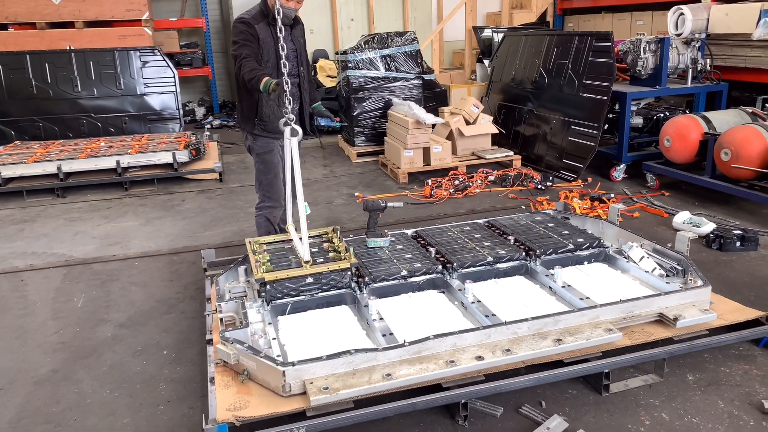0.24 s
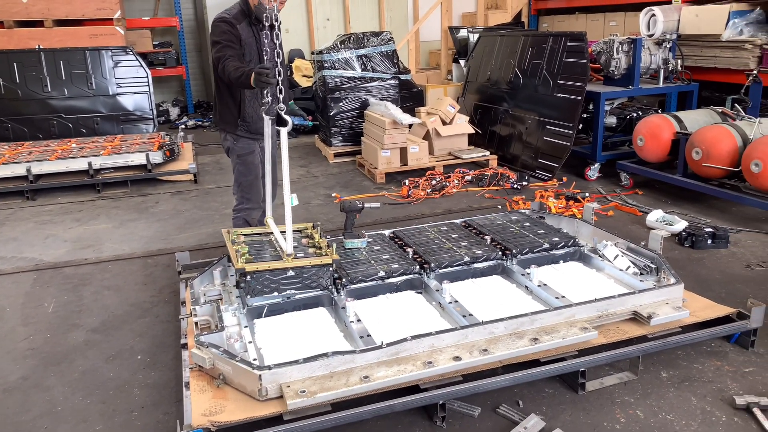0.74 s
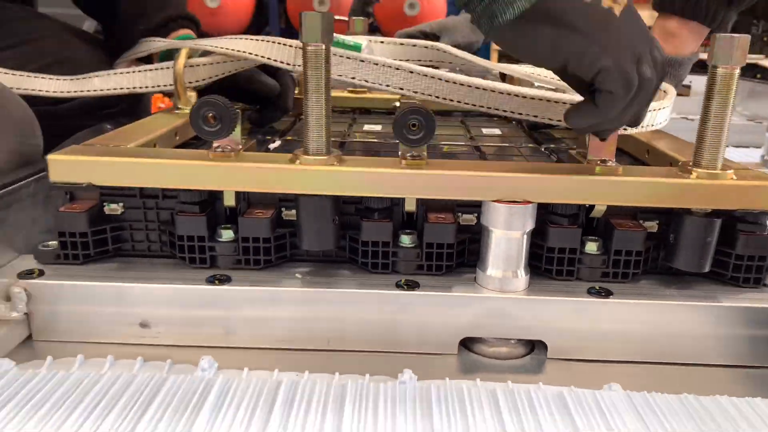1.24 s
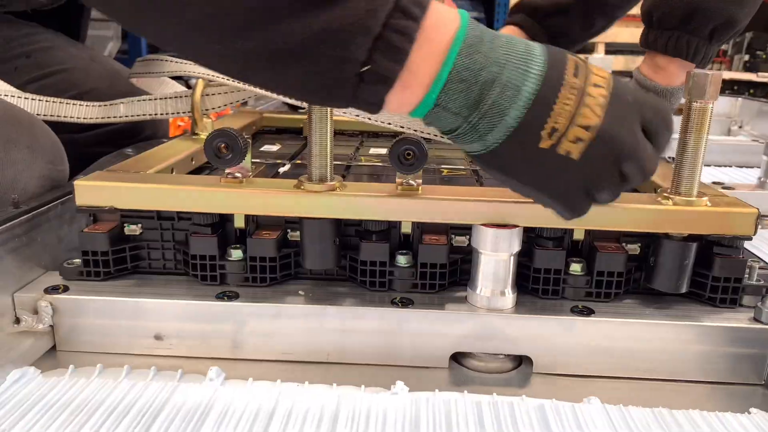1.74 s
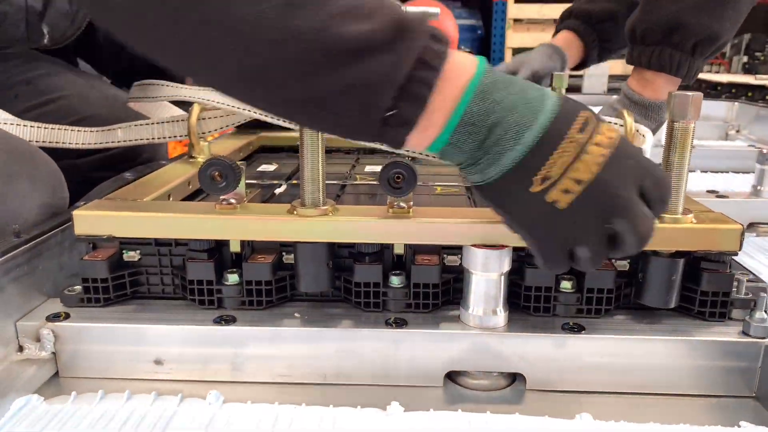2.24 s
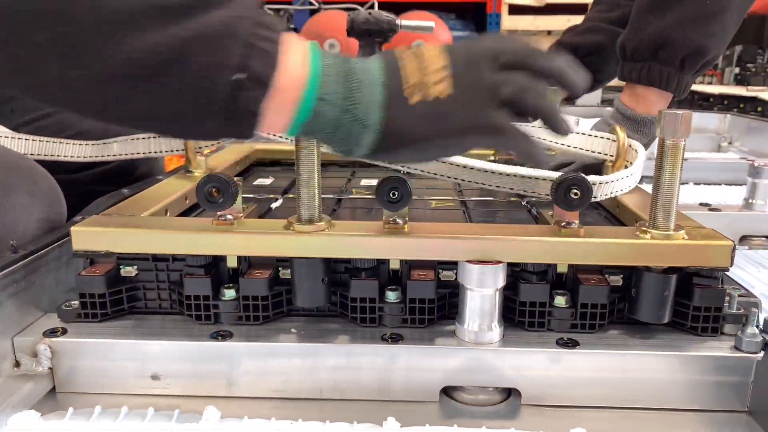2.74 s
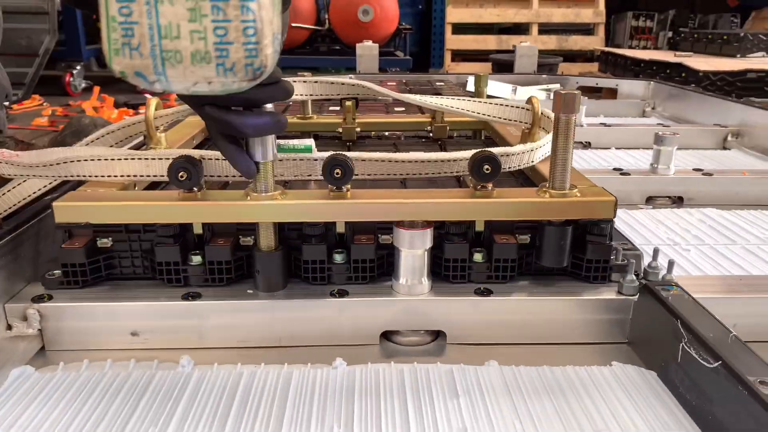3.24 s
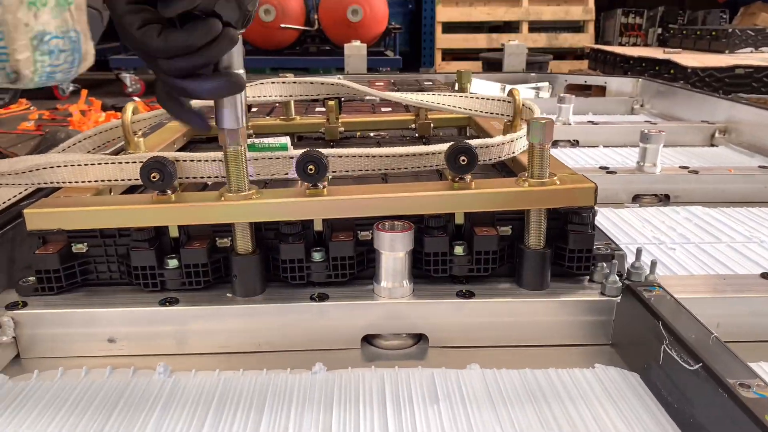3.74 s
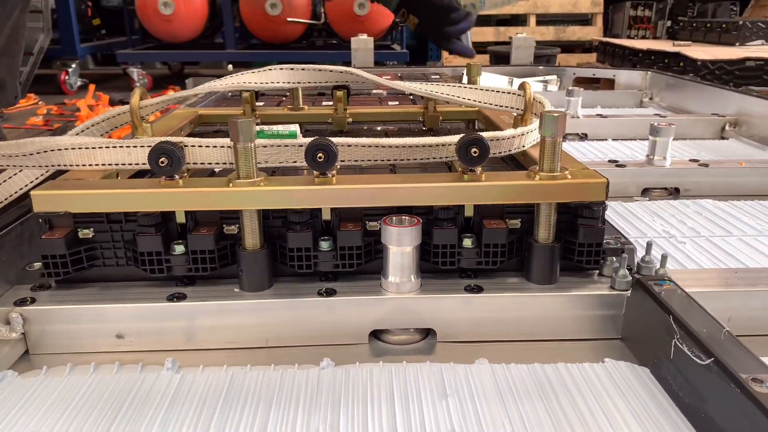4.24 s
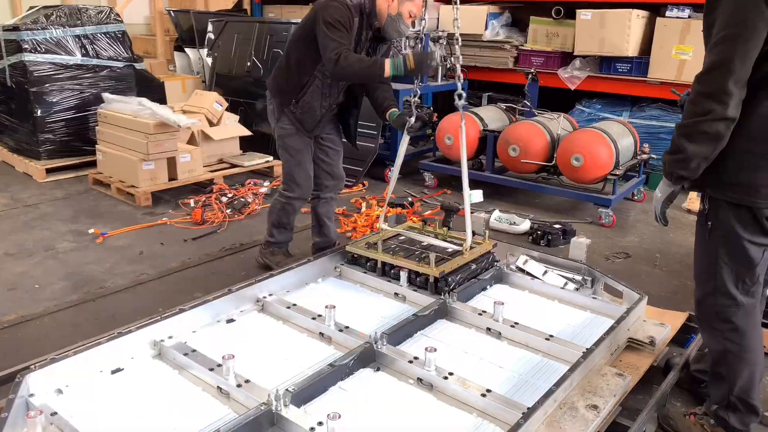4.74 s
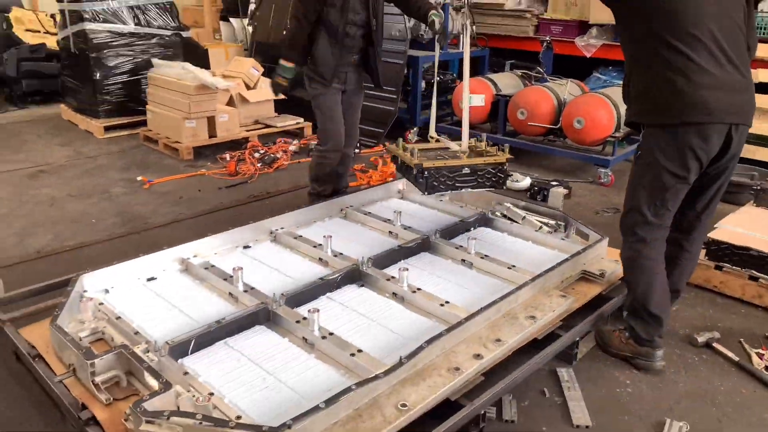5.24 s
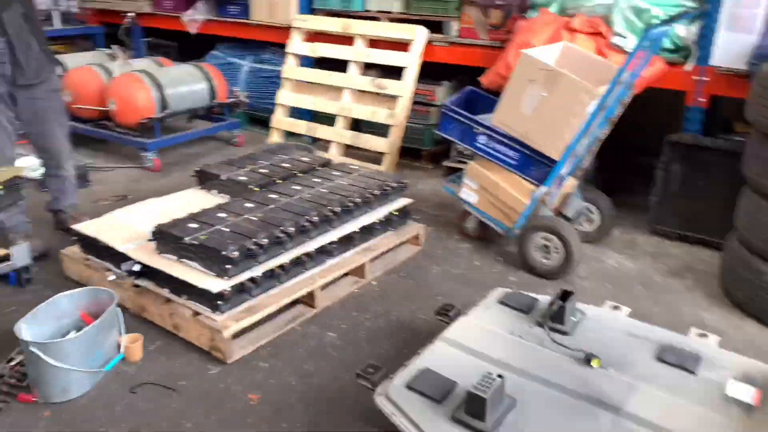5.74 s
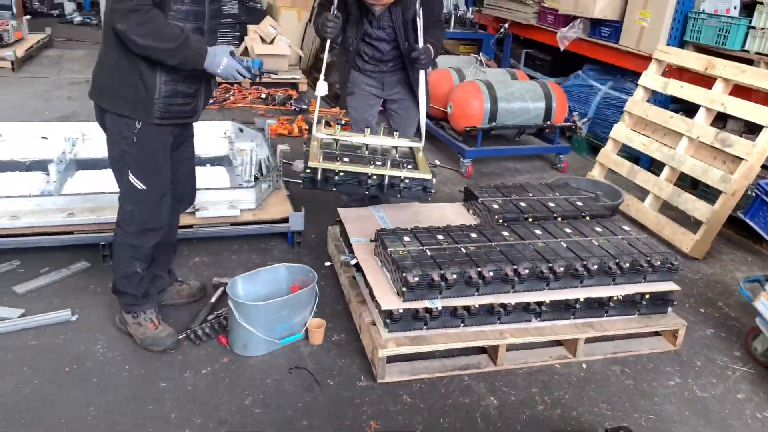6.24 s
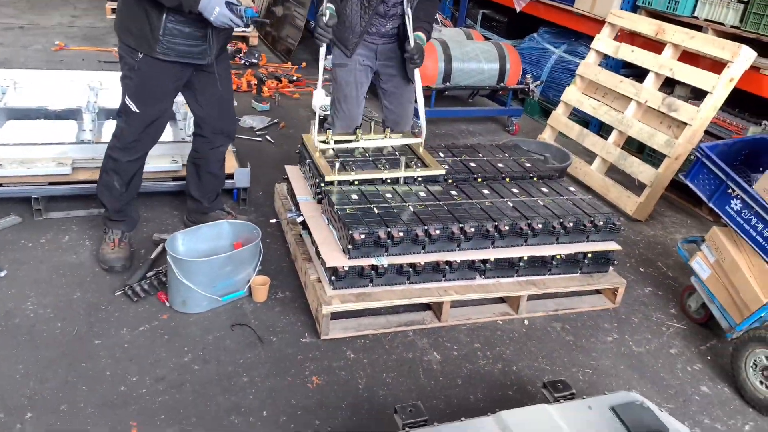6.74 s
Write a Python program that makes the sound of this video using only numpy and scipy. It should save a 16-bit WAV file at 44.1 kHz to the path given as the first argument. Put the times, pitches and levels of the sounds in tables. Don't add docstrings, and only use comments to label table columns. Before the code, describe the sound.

In a workshop yard, a soft low rumble with airy puffs and distant hoist hum plays for under a second. It cuts to close, dense, sped-up clicks and knocks of plastic knobs on a metal frame with glove scratching. Then a ratchet socket whirrs in short bursts with taps. Finally, farther back in a reverberant hall, steel bangs, chain jingles and a motor whines.

```python
import sys
import numpy as np
from scipy import signal
from scipy.fft import rfft, irfft, next_fast_len
from scipy.io import wavfile
from scipy.ndimage import uniform_filter1d

SR = 44100
rng = np.random.default_rng(int(sys.argv[2]) if len(sys.argv) > 2 else 0)


def wav_out(sig):
    wavfile.write(sys.argv[1], SR, np.round(np.clip(np.atleast_2d(sig).T, -1, 1) * 32767).astype(np.int16))


def gain_from_decibels(decibels):
    exponent = np.asarray(decibels, float) / 20
    return 10 ** exponent


N = 307816
SIZE = next_fast_len(N)

# frequency in Hz, level in dB, t60 in s.
FRAME_MODES = [(502, -16.5, 0.084), (652, -10, 0.07), (891, -10, 0.05), (1042, 0.5, 0.022),
               (1270, 3, 0.022), (1310, -10, 0.05), (1420, -3, 0.018), (1780, 2, 0.012), (2190, 0, 0.009),
               (2594, -1, 0.009), (3120, -4, 0.012)]
# frequency in Hz, level in dB, t60 in s.
STEEL_MODES = [(546, -6.5, 0.016), (915.6, 3, 0.038), (780, -18, 0.075), (1007, -4, 0.11),
               (1181, -9.5, 0.056), (1364, 0.5, 0.032), (1574, 3.5, 0.019), (1735, 2, 0.042),
               (2040, -9, 0.01), (2024, 5, 0.021), (2150, -9, 0.024), (2362, 0.5, 0.026), (2587, 9, 0.0065),
               (2830, -14.5, 0.075), (3710, -14, 0.14), (3865, -10, 0.014), (4230, -4, 0.012)]
# frequency in Hz, level in dB.
MAINS_HUM = [(180, -66), (480, -55)]
# start in s, body in dB, whirr in dB, pawl pitch factor, brightness in dB per octave.
RATCHET_BURSTS = [
    (3.098, -39, -42.5, 0.94, -7),
    (3.128, -62, -31.5, 0.84, -3.0),
    (3.163, -53, -34.5, 0.91, -3),
    (3.216, -45, -37.5, 0.95, 2),
    (3.296, -41, -33, .99, 6.5),
    (3.577, -37, -36.5, 0.96, -3.5),
    (3.874, -42, -36, 0.96, -1.5),
    (4.132, -48, -36.5, 0.96, -.8),
]


def rms_one(x):
    return x / np.sqrt(np.mean(x ** 2) + 1e-20)


def in_time(rows):
    s, *columns = np.transpose(rows)
    return [np.interp(np.arange(N) / SR, s, column) for column in columns]


def at_hz(points, hz):
    point_hz, value = np.array(points).T[:2]
    return np.interp(np.log(hz), np.log(point_hz), value)


def high_pass(x, order, cut_hz):
    return signal.sosfilt(signal.butter(order, cut_hz, "high", fs=SR, output="sos"), x)


def drift(rate_hz):
    r = np.exp(-80 * np.pi * rate_hz / SR)
    slow = signal.lfilter([1], [1, -2 * r, r * r], rng.standard_normal(N // 40 + 2002))[2000:]
    return np.interp(np.arange(N) / 40, np.arange(len(slow)), rms_one(slow))


def ring(clicks, hz, t60_s):
    r = gain_from_decibels(-60 / (t60_s * SR))
    w = 2 * np.pi * hz / SR
    return signal.lfilter([0, np.sin(w)], [1, -2 * r * np.cos(w), r * r], clicks + 1e-18)


def grit(per_s, spread_db):
    sizes = gain_from_decibels(spread_db * np.minimum(rng.exponential(1, N), 4)) * rng.choice([-1, 1], N)
    return sizes * (rng.random(N) < per_s / SR)


def coloured(spectrum, mid, side):
    # frequency in Hz, left-right likeness.
    likeness = [(60, 0.78), (180, 0.86), (550, 0.82), (1650, 0.79), (4970, 0.12), (15000, 0.45)]
    hz = np.maximum(np.arange(SIZE // 2 + 1) * SR / SIZE, 1)
    alike = np.clip(at_hz(likeness, hz), 0, 1)
    mid = np.sqrt(1 + alike) * rfft(mid, SIZE)
    side = np.sqrt(1 - alike) * rfft(side, SIZE)
    pair = gain_from_decibels(at_hz(spectrum, hz)) * np.array([mid + side, mid - side])
    return rms_one(irfft(pair, SIZE)[:, :N])


def noise(spectrum, flicker_db):
    return gain_from_decibels(flicker_db * drift(4.7)) * coloured(spectrum, *rng.standard_normal((2, N)))


def rattle(modes, level_db, per_s, spread_db, shift_db=0):
    clicks = gain_from_decibels(level_db) * rms_one(grit(per_s, spread_db))
    power = sum(gain_from_decibels(2 * db) * t60_s * SR / (4 * np.log(1000)) for _, db, t60_s in modes)
    total = 0
    for hz, db, t60_s in modes:
        favour = gain_from_decibels(shift_db * drift(12)) if shift_db else 1
        total = total + gain_from_decibels(db) * ring(clicks * favour * rng.standard_normal(N), hz, t60_s)
    return total / np.sqrt(power)


def tones(lines, wobble_db):
    turns = np.cumsum(1 + .002 * drift(15)) / SR
    return sum(np.sqrt(2) * gain_from_decibels(db + wobble_db * drift(12)) * np.sin(2 * np.pi * (hz * turns + rng.random()))
               for hz, db in lines)


def hits(events, modes, click_db, crack_db, body_db, scatter, contact_s):
    out, t = np.zeros((2, N + 3000)), np.arange(3000) / SR
    hz, db, t60_s = np.transpose(modes)[:, :, None]
    build_up = 1 - np.exp(-(t / contact_s) ** 2)
    crack_band = signal.butter(1, [1800, 15000], "band", fs=SR)
    for s, top_db, low_db, top_hz, crack_s in events:
        jitter = np.cumsum(.12 * rng.standard_normal(len(t)))
        click = gain_from_decibels(click_db) * np.sin(2 * np.pi * top_hz * t + jitter)
        crack = gain_from_decibels(crack_db) * signal.lfilter(*crack_band, rng.standard_normal((2, len(t))))
        top = gain_from_decibels(top_db - 60 * t / crack_s) * (click + crack)
        held_hz = hz * (1 + scatter * rng.standard_normal(hz.shape))
        ringing = gain_from_decibels(db - 60 * t / t60_s) * np.sin(2 * np.pi * held_hz * t)
        body = rng.standard_normal(len(modes)) @ ringing
        body *= gain_from_decibels(low_db + body_db) / np.abs(body).max()
        pan = gain_from_decibels(0.74 * rng.standard_normal() * np.array([[1], [-1]]))
        at = round(s * SR)
        out[:, at:at + len(t)] += (top + body) * build_up * pan
    return out[:, :N]


def efforts(start_s, hold_s, level_db, rise_db_s, fall_db_s, rest_db):
    t = np.arange(0, N, 32) / SR
    late = t - start_s[:, None]
    rising = rise_db_s * np.minimum(late, 0)
    falling = fall_db_s * np.maximum(late - hold_s[:, None], 0)
    each = level_db[:, None] + rising - falling
    return np.interp(np.arange(N) / SR, t, np.maximum(each.max(axis=0), rest_db))


def room(x, t60_s, wet_db, cut_hz):
    t = np.arange(SR // 2) / SR
    tail = coloured([(300, 0), (cut_hz, 0), (16000, -14)], *rng.standard_normal((2, N)))[:, :len(t)]
    tail = tail * gain_from_decibels(-60 * t / t60_s) * (t > .002)
    tail /= np.sqrt(np.mean(np.sum(tail ** 2, axis=1)))
    return x + gain_from_decibels(wet_db) * signal.fftconvolve(x * np.ones((2, 1)), tail, axes=1)[:, :N]


def hall():
    # frequency in Hz, density in dB per Hz.
    hall_colour = [(59, -58.5), (100, -15.5), (301, -9), (469, 2), (580, 1), (1240, 2), (1350, -3.5),
                   (2250, -3.5), (3900, -9.5), (5720, -17.5), (15800, -69.5)]
    return noise(hall_colour, flicker_db=3.0)


def far_air_line():
    # time in s, level in dB.
    puff_levels = [(0.0, -65), (0.092, -74), (0.244, -55), (0.432, -84), (0.55, -59), (0.566, -74),
                   (0.696, -59), (0.806, -79), (0.86, -52.5)]
    # frequency in Hz, density in dB per Hz.
    puff_colour = [(5000, -26), (7500, 0), (9900, 3), (11000, -10), (11500, -34), (12900, -4), (15000, -15),
                   (15600, -30)]
    return gain_from_decibels(in_time(puff_levels)[0]) * noise(puff_colour, flicker_db=2)


def far_hoist():
    # frequency in Hz, level in dB.
    far_lines = [(506.0, -47), (839.8, -59.5), (1007, -59.5), (2013, -69), (2180, -62.5)]
    # time in s, level in dB.
    far_swell = [(0, -3), (.3, -14), (.45, 1.5), (.62, -1.5), (.7, -4.5), (.87, -13)]
    return gain_from_decibels(in_time(far_swell)[0]) * tones(far_lines, wobble_db=3.5)


def yard():
    # time in s, low rumble in dB, air in dB.
    yard_levels = [
        (0.0, -35.5, -40),
        (0.044, -40.5, -45.5),
        (0.865, -42.5, -55),
    ]
    # frequency in Hz, density in dB per Hz.
    rumble_colour = [(15, -54), (25, -37), (46, -22), (113, -2), (220, -1), (444, -8), (501, -7.5),
                     (626, -13), (1500, -55), (1950, -54), (3300, -120)]
    air_colour = [(470, -42), (800, -3.5), (3330, -13), (4370, -15), (7180, -29), (9920, -35), (11500, -60),
                  (12900, -44), (15500, -43)]
    # frequency in Hz, level in dB, t60 in s.
    low_hum_modes = [(61, -1.5, .5), (110, 8, 0.28), (163, -9, 0.26), (222.7, 2.5, 0.43), (326, -7, 0.35),
                     (379, -5.5, 0.35)]
    # start in s, click in dB, body in dB, click in Hz, crack t60 in s.
    scuff_events = [
        (.697, -40, -42, 4600, .06),
        (.712, -40, -44, 4150, .06),
    ]
    rumble_db, air_db = in_time(yard_levels)
    rumble = gain_from_decibels(rumble_db) * noise(rumble_colour, flicker_db=1.0)
    air = gain_from_decibels(air_db) * noise(air_colour, flicker_db=1.6)
    low_hum = rattle(low_hum_modes, -42.5, 3000, spread_db=1.0)
    scuff = hits(scuff_events, STEEL_MODES[1:4], click_db=0, crack_db=-22, body_db=0, scatter=.02, contact_s=.003)
    return rumble + air + far_air_line() + low_hum + far_hoist() + scuff


def knob_knocks():
    # start in s, click in dB, frame in dB, click in
    # Hz.
    knock_events = [(0.9006, -22, -18, 8400), (0.9137, -21.5, -23.5, 5750), (0.9502, -14, -14, 4080),
                    (0.9883, -18, -29, 7740), (1.0285, -16.5, -21, 7500), (1.0687, -19, -19, 5800),
                    (1.0982, -5, -11, 6430), (1.1606, -18.5, -30, 7800), (1.2903, -18.5, -25, 10100),
                    (1.321, -8, -19, 8760), (1.4235, -18, -20.5, 4060), (1.4567, -9.5, -11, 3930),
                    (1.5135, -23, -15, 4100), (1.7067, -14.5, -36, 8400), (1.7328, -19, -35, 8600),
                    (1.7656, -14.5, -15, 10000), (1.8418, -17, -34, 9700), (1.8767, -17.5, -35, 8700),
                    (1.9072, -19, -18.5, 9250), (2.3573, -13.5, -42, 11400), (2.4424, -15.5, -11, 6000),
                    (2.5316, -21, -55, 10100), (2.5979, -14, -18.5, 6200), (2.6915, -17.5, -22.5, 4770),
                    (2.72, -12.5, -16, 4230), (2.784, -12.5, -15, 4240), (2.9367, -10, -11, 4790),
                    (0.9246, -21.5, -25, 5900), (0.956, -18.5, -14, 3000), (.998, -27, -30, 7500),
               (1.083, -47, -25, 3000), (1.1654, -30, -23, 7400), (1.193, -32, -45, 7550),
               (1.3182, -20, -40, 9000), (1.5188, -24, -17, 2970), (1.5444, -33, -21.5, 3000),
               (1.5774, -32.5, -36, 7000), (1.5863, -34, -27, 6000), (1.628, -31, -32, 8550),
               (1.6458, -34, -32, 8000), (1.709, -15, -37, 8700), (1.83, -35, -36, 9000),
               (1.855, -30, -25, 8900), (1.880, -20, -33, 8550), (1.918, -25, -28, 8000),
               (1.94, -28, -36, 9000), (1.971, -33, -33, 9000), (2.095, -26, -25, 8700),
               (2.102, -36, -34, 9400), (2.239, -26, -26, 10500), (2.271, -27.5, -35, 9200),
               (2.3922, -25, -34, 2950), (2.4224, -38, -27, 2980), (2.5938, -22, -26, 6100),
               (2.6593, -28, -26, 5960), (2.6872, -22, -26, 5960), (2.699, -25, -16, 4000),
               (2.7155, -21, -25, 3950), (2.731, -22.5, -26, 9050), (2.7422, -15, -25, 6100),
               (2.817, -17, -17, 2500), (2.8435, -23, -21, 6040), (2.949, -21, -34, 3070),
               (2.966, -25.5, -29, 2600)]
    # start in s, click in dB, click in
    # Hz.
    further_knocks = [(1.1422, -25, 9900), (1.2301, -22, 8000), (1.4862, -18, 3930), (1.5612, -22.5, 4300),
                      (1.6672, -21.5, 9640), (1.689, -28, 9800), (1.176, -21, 8800), (1.33, -16, 4800),
                      (1.385, -19.5, 3640), (1.953, -22, 9000), (2.004, -26, 3740), (2.0437, -20.5, 8650),
                      (2.09, -22, 4600), (2.124, -22, 8100), (2.188, -15, 10000), (2.2622, -20.5, 4600),
                      (2.225, -19, 6100), (2.3096, -16.5, 3800), (2.476, -15, 11000), (2.6223, -20, 4450),
                      (2.6398, -17.5, 4270), (2.653, -18.5, 6270), (2.8343, -19.5, 4460), (2.871, -21, 11400),
                      (2.8954, -18.5, 8000)]
    # start in s, click in dB, frame in dB, click in Hz.
    pin_pings = [
        (2.1641, 0.5, -46, 9560),
        (2.2146, -8, -40, 9020),
        (2.295, -15.5, -30, 8600),
    ]
    touches = knock_events + [(s, db, db - 1, hz) for s, db, hz in further_knocks]
    events = [(*touch, .0085) for touch in touches]
    bounces = rng.random((len(touches), 3)) * [.005, -8, .4] + [.002, -10, .8]
    for (s, top_db, low_db, hz), (lag_s, loss_db, shift) in zip(touches, bounces):
        events.append((s + lag_s, top_db + loss_db, low_db + loss_db, hz * shift, .007))
    knocks = hits(events, FRAME_MODES, click_db=-1.0, crack_db=3.5, body_db=-1.0, scatter=0.049, contact_s=0.00072)
    pings = hits([(*ping, .012) for ping in pin_pings], FRAME_MODES, click_db=0, crack_db=-14, body_db=2,
                 scatter=.04, contact_s=.0016)
    return knocks + pings


def knobs():
    # start in s, hold in s, frame rattle in dB, scratch in dB.
    grips = [(0.941, 0.058, -41, -49.5), (1.164, 0.0053, -31, -41), (1.24, 0.083, -50, -42.5),
             (1.305, 0.14, -39.5, -37), (1.452, 0.096, -53, -43.5), (1.68, 0.097, -40.5, -50),
             (1.76, 0.051, -45, -42.5), (1.864, 0.24, -39.5, -48), (2.132, 0.035, -34, -32.5),
             (2.197, 0.11, -42.5, -50.5), (2.347, 0.0059, -34, -32.5), (2.368, 0.0115, -37, -28.5),
             (2.408, 0.11, -38.5, -35.5), (2.528, 0.0077, -36.5, -27), (2.584, 0.11, -39.5, -45),
             (2.741, 0.0047, -28, -30.5), (2.76, 0.27, -38.5, -41)]
    # frequency in Hz, density in dB per Hz.
    scratch_colour = [(1470, -49), (2500, -23.5), (3560, -5), (6310, 0), (7190, -1), (9570, 3), (15800, -2)]
    start_s, hold_s, rattle_db, scratch_db = np.transpose(grips)
    rise_db_s, fall_db_s = 1407, 447
    rattle_db = efforts(start_s, hold_s, rattle_db, rise_db_s, fall_db_s, rest_db=-49.5)
    scratch_db = efforts(start_s, hold_s, scratch_db, rise_db_s, fall_db_s, rest_db=-55.5)
    frame = rattle(FRAME_MODES, rattle_db - 4, 700, spread_db=3.5, shift_db=5)
    scratch = coloured(scratch_colour, grit(6000, spread_db=2.5), grit(6000, spread_db=2.5))
    near = room(knob_knocks() + frame, t60_s=.06, wet_db=-17.0, cut_hz=3000)
    return near + gain_from_decibels(scratch_db + 3 * drift(60)) * scratch + tones(MAINS_HUM, wobble_db=1.5)


def ratchet(start_s, now):
    # frequency in Hz, density in dB per Hz.
    whirr_colour = [(880, -47), (1500, -18), (2600, -21), (3430, -9), (5560, 0), (9940, 1.5), (15800, -5)]
    # frequency in Hz, level in dB, t60 in s.
    pawl_modes = [(1360, -20.5, .03), (2080, -12, 0.0095), (2840, 2, 0.0088), (4450, -2, 0.0093),
                  (7000, 2.5, 0.0022), (10100, -3, .007)]
    t = np.arange(N) / SR
    teeth_per_s = 370 - 1400 * np.clip(t - start_s[now], 0, .1) + 15 * drift(40)
    teeth = np.cumsum(teeth_per_s) / SR
    strength = gain_from_decibels(2 * rng.standard_normal(4000))[teeth.astype(int)]
    pulses = strength * np.exp(-4.0 * (teeth % 1)) + np.where(t < 3.21, .5, .12)
    hiss = coloured(whirr_colour, *(pulses * rng.standard_normal((2, N))))
    pawl = np.zeros((2, N))
    for s, _, _, pitch, tilt_db in RATCHET_BURSTS:
        span = slice(round(s * SR) - 200, round(s * SR) + 5500)
        mine = (start_s[now[span]] == s) | (t[span] < s)
        buzz = 0
        for hz, db, t60_s in pawl_modes:
            level_db = db + tilt_db * np.log2(hz / 4000) + 2 * drift(25)[span]
            strikes = pulses[span] * rng.standard_normal((2, len(mine)))
            buzz = buzz + gain_from_decibels(level_db) * ring(strikes, hz * pitch, t60_s)
        pawl[:, span] = np.where(mine, rms_one(buzz + .6 * buzz[::-1]), pawl[:, span])
    return gain_from_decibels(-1.0) * hiss + gain_from_decibels(-2.0) * high_pass(pawl, 2, 500)


def socket_tool():
    # start in s, body in dB.
    idle_snatches = [(2.972, -63), (3.041, -53), (3.201, -44.5), (3.334, -72), (3.347, -80), (3.403, -62),
                     (3.465, -56), (3.511, -49), (3.645, -50), (3.663, -56), (3.7, -54), (3.743, -52.5),
                     (3.814, -62.5), (3.952, -66), (4.004, -54), (4.064, -57), (4.201, -64.5), (4.278, -55.5),
                     (4.351, -48), (4.42, -71), (4.518, -52), (4.598, -50.5), (4.694, -51)]
    # frequency in Hz, density in dB per Hz.
    body_colour = [(88, -62.5), (150, -37), (352, -9.5), (499, -5), (1130, -0.5), (1280, -0.5),
                   (1620, -8.5), (2200, -21), (2860, -25), (4840, -120)]
    idle_colour = [(880, -51), (1500, -9.5), (3080, -10), (6260, -20), (7850, -15.5), (15800, -18)]
    # start in s, click in dB, frame in dB, click in Hz.
    socket_taps = [(3.048, -27.5, -34, 2420), (3.0809, -34, -30.5, 2320), (3.129, -5.5, -37, 2520),
                   (3.406, -38, -38, 1920), (3.119, -21, -34, 3000), (3.229, -20, -34, 680),
                   (3.232, -27, -39, 700), (3.308, -26, -29, 695), (3.325, -42, -47, 800),
                   (3.747, -41, -50, 8170), (4.06, -55, -64, 9000), (3.5, -35, -36, 2040),
                   (3.5084, -21.5, -55, 7360), (3.867, -33, -46, 2760), (4.042, -34.5, -52, 3200),
                   (4.365, -33, -40, 2940)]
    # start in s, ring in dB, body in dB, ring in Hz, t60 in s.
    tool_rings = [
        (3.702, -50, -80, 1950, 0.17),
        (3.706, -47, -80, 1000, 0.23),
        (3.955, -58, -80, 2200, 0.15),
    ]
    # frequency in Hz, level in dB, t60 in s.
    bit_modes = [(7500, -3, .005), (8200, -12, .01)]
    # time in s, level in dB.
    bit_shake = [
        (3.507, -90),
        (3.509, -56),
        (3.575, -49),
        (3.64, -56),
        (3.65, -90),
    ]
    snatches = sorted([row[:3] for row in RATCHET_BURSTS] + [(s, db, db - 5.5) for s, db in idle_snatches])
    start_s, body_db, whirr_db = np.transpose(snatches)
    now = np.clip(np.searchsorted(start_s, np.arange(N) / SR) - 1, 0, None)
    body_db, whirr_db = uniform_filter1d(np.array([body_db[now], whirr_db[now]]), size=200)
    whirr = np.where(whirr_db > -47, ratchet(start_s, now), noise(idle_colour, flicker_db=2.1))
    body = gain_from_decibels(body_db - 8.5) * noise(body_colour, flicker_db=4.5)
    taps = hits([(*tap, 0.0074) for tap in socket_taps], FRAME_MODES, click_db=-2.5, crack_db=0.0, body_db=-3.0,
                scatter=0.03, contact_s=0.00038)
    rings = hits(tool_rings, FRAME_MODES, click_db=0, crack_db=-20, body_db=0, scatter=0, contact_s=.002)
    loose_bit = rattle(bit_modes, in_time(bit_shake)[0], 600, spread_db=2.5)
    return gain_from_decibels(whirr_db) * whirr + body + rings + loose_bit + room(taps, t60_s=0.035, wet_db=-9.0, cut_hz=13000)


def near_hoist():
    # frequency in Hz, level in dB.
    lift_lines = [(1421, -58), (1588, -58), (2697, -61), (3784, -60), (4027, -59)]
    lower_lines = [(909.8, -49), (1346, -51), (2880, -59), (4032, -51.5)]
    # time in s, lifting in dB, lowering in dB.
    motor_run = [
        (4.72, 0, -30),
        (5.2, 0, -30),
        (5.4, -10, -20),
        (6.4, -15, -10),
        (6.55, -30, 0),
        (6.98, -30, -3),
    ]
    # frequency in Hz, level in dB, t60 in s.
    gear_modes = [(5975, -65, .05), (7900, -64, .05), (8050, -67, .05), (3838, -58, .07), (2880, -60, .08)]
    # time in s, gear level in dB.
    gear_run = [(4.72, -20), (5.07, -12), (5.09, 0), (5.22, 0), (5.4, -10), (6.5, -7), (6.98, -7)]
    lift_db, lower_db = in_time(motor_run)
    gear_db = in_time(gear_run)[0]
    whine = gain_from_decibels(lift_db) * tones(lift_lines, wobble_db=6.0) + gain_from_decibels(lower_db) * tones(lower_lines, wobble_db=4.0)
    gears = sum(rattle([(hz, 0, t60_s)], db + gear_db, 3000, spread_db=2) for hz, db, t60_s in gear_modes)
    return whine + gears


def load_blows():
    # start in s, click in dB, steel in dB, click in Hz.
    blow_events = [(4.827, -11.5, -8.5, 3490), (4.862, -17, -19, 11900), (4.887, -18.5, -11, 2480),
                   (5.253, -22, -7, 2430), (5.838, -32, -50, 6500), (5.881, -23, -37, 3200),
                   (6.818, -16.5, -17, 7850), (6.878, -21, -20, 6300), (6.974, -36, -62, 7600),
                   (5.2275, -10, -16, 3790), (5.4223, -35.5, -18.5, 3250), (5.5564, -26, -41, 7200),
                   (5.6135, -34, -14, 3260), (5.676, -28.5, -64, 3240), (6.3596, -21, -0.5, 3130),
                   (6.4463, -16.5, -32, 8320), (6.6993, -11.5, -4, 3440), (6.868, -17.5, -42, 3280)]
    landing_s, landing_modes = 6.708, [(893, -27, .6), (912, -34, .4)]
    blows = hits([(*blow, 0.031) for blow in blow_events], STEEL_MODES, click_db=-4, crack_db=1, body_db=-5.5,
                 scatter=0.036, contact_s=0.0016)
    landing = 1. * (np.arange(N) == round(landing_s * SR))
    return blows + sum(gain_from_decibels(db) * ring(landing, hz, t60_s) for hz, db, t60_s in landing_modes)


def hoisting():
    # start in s, hold in s, clatter in dB, jingle in dB.
    jolts = [(4.826, 0.048, -23.5, -27.5), (5.229, 0.019, -22.5, -28.5), (5.884, 0.076, -34.5, -38),
             (5.957, 0.035, -23.5, -32.5), (5.968, 0.034, -21.5, -27), (6.038, 0.034, -24, -29),
             (6.138, 0.061, -23, -28), (6.224, 0.027, -22.5, -30), (6.092, .035, -30.5, -35),
             (6.27, 0.034, -29.5, -36), (6.382, 0.029, -31, -35.5), (6.304, 0.06, -27.5, -31.5),
             (6.365, 0.013, -21, -32), (6.442, 0.0051, -27, -31), (6.701, 0.0086, -23.5, -28.5),
             (6.817, 0.0041, -27.5, -28.5), (6.867, 0.0053, -23.5, -29), (6.885, 0.03, -28.5, -39)]
    # time in s, level in dB.
    rolling = [(4.72, -1), (5.22, -2.5), (5.3, 1), (6.3, 0), (6.5, 0.5), (6.98, -8)]
    # frequency in Hz, level in dB, t60 in s.
    link_modes = [(3270, 2, .12), (4890, -5, .06), (5360, -13, .05), (8220, -15, .03), (9800, -13, .04)]
    # frequency in Hz, density in dB per Hz.
    jingle_colour = [(1760, -42), (3000, -5), (3350, -3.5), (3960, -15.5), (4980, -10), (5890, -14.5),
                     (9580, -12.5), (15800, -20.5)]
    # time in s, level in dB.
    wheel_squeal = [
        (5.2, -59),
        (5.32, -57),
        (5.85, -55),
        (5.9, -77),
    ]
    t = np.arange(N) / SR
    drag_start_s, drag_end_s, snag_s = 5.87, 6.4, 6.35
    clatter_sway_db, jingle_sway_db = -48.5, -51
    start_s, hold_s, clatter_db, jingle_db = np.transpose(jolts)
    dragged = (start_s > drag_start_s) & (start_s < snag_s)
    rise_db_s = np.where(dragged, 603, 3002)[:, None]
    clatter_db = efforts(start_s, hold_s, clatter_db, rise_db_s, 199, clatter_sway_db)
    jingle_db = efforts(start_s, hold_s, jingle_db, rise_db_s, 272, jingle_sway_db)
    rolling_db = in_time(rolling)[0]
    slackened_db = jingle_db + np.minimum(rolling_db, 0) * (jingle_db <= jingle_sway_db + 1)
    jingle_db = np.maximum(slackened_db, jingle_sway_db + rolling_db)
    link_db = jingle_db - 2.5
    link_db = np.where(t < 5.28, np.maximum(link_db, -42), link_db)
    taut = np.abs(t - (drag_start_s + drag_end_s) / 2) <= (drag_end_s - drag_start_s) / 2
    slack_db = np.where(taut, 0, -12)
    steel = rattle(STEEL_MODES, clatter_db - 3, 1300, spread_db=3.5, shift_db=4)
    links = rattle(link_modes, 1.5 * link_db + 15 + slack_db, 1500, spread_db=2.0)
    squeal = rattle([(3280, 0, 0.03)], in_time(wheel_squeal)[0], 3200, spread_db=2.0)
    jingle = coloured(jingle_colour, grit(4000, spread_db=2.0), grit(4300, spread_db=2.5))
    far = room(steel + links + squeal + load_blows(), t60_s=0.26, wet_db=-8.0, cut_hz=31500)
    far = high_pass(far, 2, 400)
    return far + gain_from_decibels(jingle_db + 0.5) * jingle + near_hoist() + tones(MAINS_HUM, wobble_db=3.0)


def scene():
    cuts_s = [0, .868, 2.971, 4.722, 6.98]
    hall_db = [-51.5, -73, -45.5]
    t, out = np.arange(N) / SR, 0
    background = hall()
    for k, view in enumerate([yard, knobs, socket_tool, hoisting]):
        since_s = t - cuts_s[k] + (k == 0)
        left_s = cuts_s[k + 1] + (k == 3) - t
        gate = np.clip(np.minimum(since_s, left_s) / .003, 0, 1)
        sound = view()
        if k > 0:
            sound = high_pass(sound + gain_from_decibels(hall_db[k - 1]) * background, 4, 260)
        out = out + gate * sound
    return out * np.clip(np.abs(t - 5.082) / .004, .1, 1)


def low_pass(x):
    return signal.sosfilt(signal.butter(12, 16970, fs=SR, output="sos"), x)


def record(dry):
    # frequency in Hz, left-right difference in dB.
    side_lean = [(60, 0.5), (240, -0.5), (950, -0.5), (3770, -2), (15000, 0)]
    hz = np.arange(SIZE // 2 + 1) * SR / SIZE + 1
    lean = gain_from_decibels(at_hz(side_lean, hz) / 2)
    top = gain_from_decibels(np.interp(hz, [15700, 16000, 17000, 17300], [1, -23, -39, -80]))
    mix = irfft(rfft(dry, SIZE) * top * np.array([lean, 1 / lean]), SIZE)[:, :N]
    return low_pass(mix)


dry = scene()
out = record(dry)
wav_out(out)
```